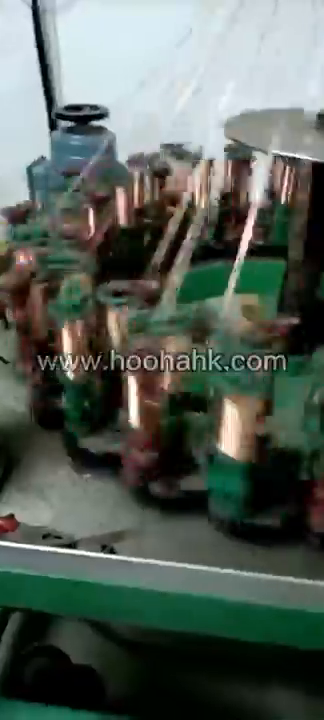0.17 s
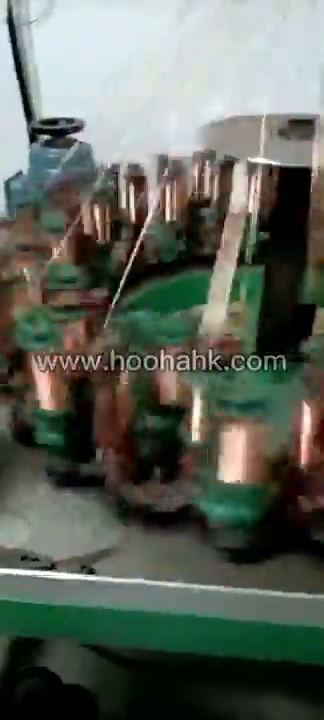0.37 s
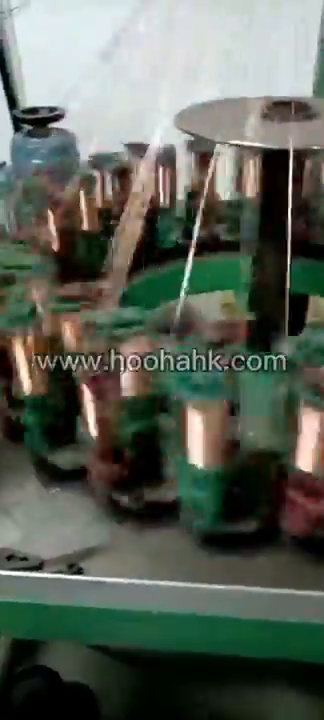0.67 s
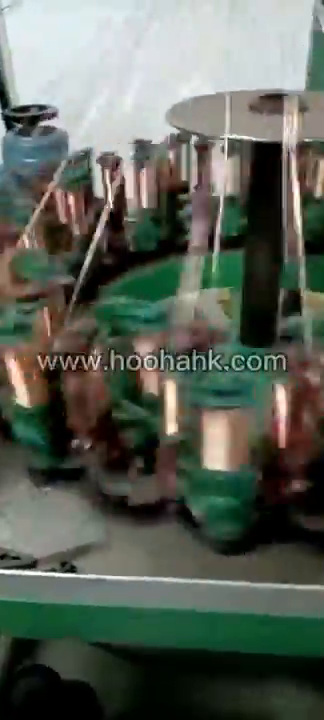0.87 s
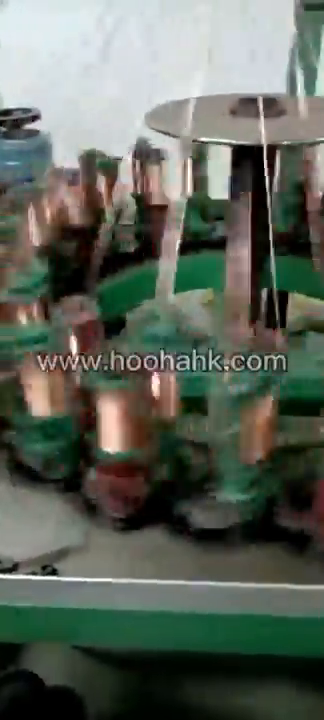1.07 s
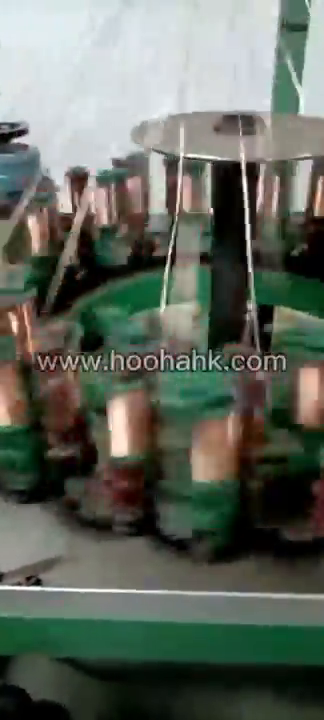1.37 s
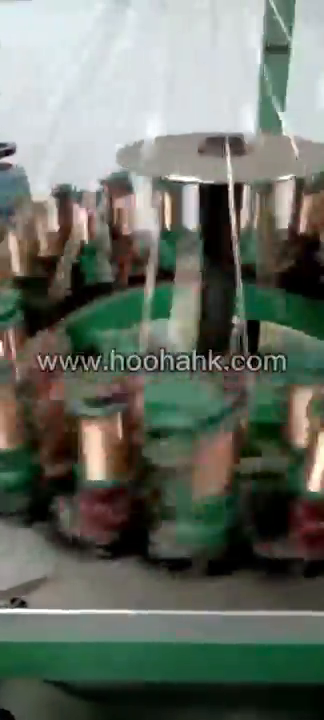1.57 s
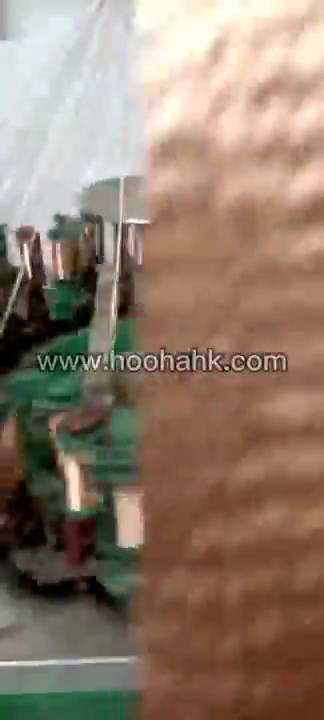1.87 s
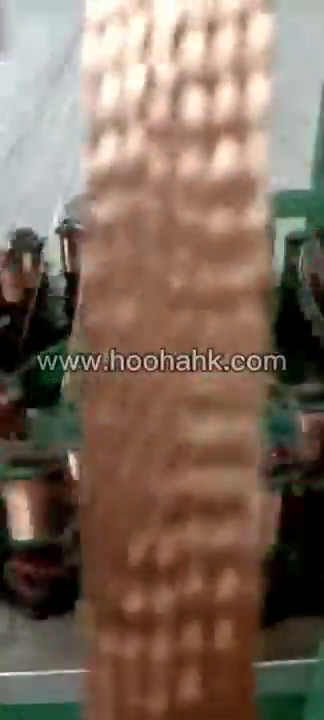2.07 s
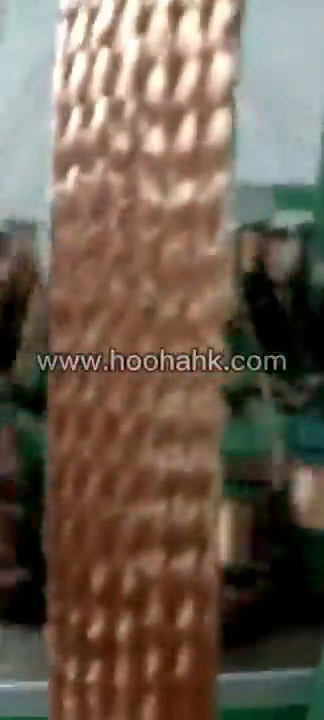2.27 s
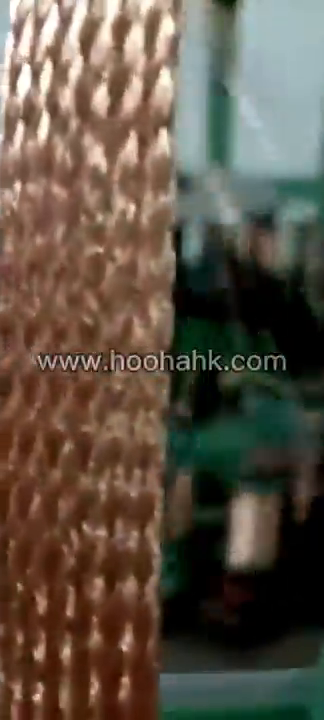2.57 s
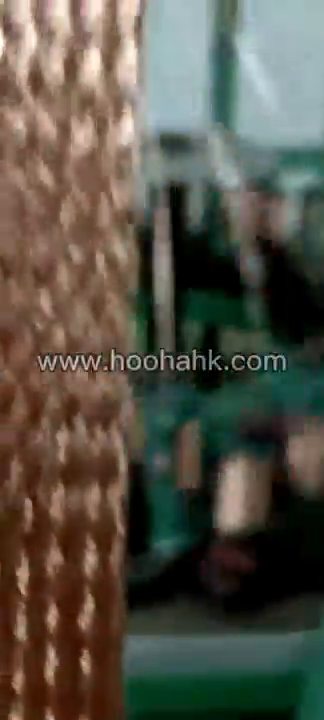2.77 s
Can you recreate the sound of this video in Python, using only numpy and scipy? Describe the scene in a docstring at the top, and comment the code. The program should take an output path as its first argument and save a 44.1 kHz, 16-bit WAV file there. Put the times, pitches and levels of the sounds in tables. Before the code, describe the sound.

Loud metallic clatter of a running wire braider, with clacking bobbin carriers and faint squeaking.

```python
"""A loud steel clatter cuts in abruptly and eases after a second: a wire braider, close by in a factory hall.
Horn gears hand bobbin carriers along their track; the frame thumps and rumbles under a thin gear whine,
a singing rod and the whistle of the motor drive. Loose carriers rattle, the frame knocks, steel clinks.
A dry bearing squeaks about once a turn, and carriers clack into the slots of the next gear."""
import sys
import numpy as np
from scipy import signal
from scipy.fft import rfft, irfft
from scipy.io import wavfile
from scipy.ndimage import uniform_filter1d

SR = 44100
rng = np.random.default_rng(int(sys.argv[2]) if len(sys.argv) > 2 else 0)


def waveform_to_disk(signal):
    """Save audio, clipped to [-1, 1], as 16-bit WAV at the path in sys.argv[1]."""
    frames = np.transpose(np.atleast_2d(signal))
    scaled = np.clip(frames, -1, 1) * 32767
    samples = np.round(scaled).astype(np.int16)
    wavfile.write(sys.argv[1], SR, samples)


N = 128772
T = np.arange(N) / SR

START_S, LOWPASS_HZ, HALL_T60_S = .105, 11500, 0.64
TURN_S, HANDOVERS_PER_TURN, TEETH_PER_TURN = .515, 4, 28  # horn gear
HANDOVER_AT_S, HANDOVER_SWING_DB, TOOTH_SWING_DB = .53, 0.94, -0.5
BLOWS_PER_S, PART_NOISE_T60_S, PART_TONE_T60_S, PART_SCATTER = 1500, 0.028, 0.062, .06
GEAR_HZ, GEAR_STEADY = 539.4, 0.57
ROD_HZ, ROD_WAVER_HZ = 1367, 4.12
DRIVE_HZ, DRIVE_STEP_HZ = 8940, 49.7
RATTLE_BLOWS_PER_S, RATTLE_DECAY_S, RATTLE_PEAK_DB, RATTLE_WIDTH_OCT = 460, 0.0087, 5, 0.34
KNOCK_RISE_S, KNOCK_T60_S = 0.0068, .16
CLINK_RISE_S, CLINK_T60_S = 0.00076, 0.019
SQUEAK_SAG, SQUEAK_FALL, SQUEAK_TAIL_FALL, SQUEAK_JITTER = 0.0175, 0.0121, .07, .012  # shares of pitch
SQUEAK_ROUGH_DB, SQUEAK_TAIL_DB, SQUEAK_TAIL_S = 4, -10, 0.079
CLACK_RISE_S, CLACK_T60_S = 0.00098, 0.038

# Machine loudness: time_s, clatter_db, thumps_db
MACHINE_LEVEL = [(.11, -26.5, -37), (.3, -24, -36), (.55, -24, -33), (.8, -23, -39.5), (.94, -24.5, -37),
                 (1.01, -30.5, -42), (1.1, -30.5, -37), (1.42, -29.5, -38.5), (1.5, -32, -35.5),
                 (1.6, -30, -40.5), (1.8, -30.5, -39.5), (2.0, -31.5, -37.5), (2.15, -29.5, -37),
                 (2.3, -30.5, -39.5), (2.6, -30, -37), (2.92, -32.5, -41)]
# Struck steel parts: pitch_hz
PART_HZ = [1597, 1720, 2386, 2510, 2620, 2926, 3085, 3500, 3830, 4506, 5790, 7040]
# Clatter spectrum: freq_hz, gain_db
STEEL_SPECTRUM = [(120, -9), (290, -1), (430, -1), (485, -5.5), (590, -0.5), (690, 2), (800, 3), (860, -3),
                  (940, -4), (1080, 0.5), (1220, -3), (1500, -1), (1680, 0.7), (2050, -0.5), (2500, -0.5),
                  (3200, -2), (4200, -3.5), (4600, -3), (5400, -5.5), (6000, -4.5), (7200, -7.5),
                  (8500, -8), (8900, -9.5), (9900, -9.5), (10700, -15.5), (11500, -36)]
# Frame thump spectrum: freq_hz, gain_db
FRAME_SPECTRUM = [(50, -25), (95, -7), (122, 2.5), (145, -0.5), (185, 2), (230, -1.5), (300, -13.5),
                  (700, -31.5)]
# Drive rumble spectrum: freq_hz, gain_db
RUMBLE_SPECTRUM = [(15, -8), (29, -1), (42, 0.5), (58, -3), (80, -4), (130, -10), (400, -43)]
# Gear tone loudness: time_s, level_db
GEAR_LEVEL = [(.3, -42), (1.2, -49.5), (2.9, -47)]
# Steel kept ringing: pitch_hz, width_hz, level_re_clatter_db
STEEL_MODES = [(450, 12, -34), (570, 11, -31.5), (800, 31, -23), (826, 20, -26), (4330, 26, -33),
               (6800, 35, -37)]
# Singing rod loudness: time_s, level_db
ROD_LEVEL = [(.1, -64), (.55, -39.5), (.7, -41), (.92, -37), (1.1, -46.5), (1.4, -49), (2.9, -57)]
# Drive whistle loudness: time_s, level_db
DRIVE_LEVEL = [(.1, -42), (1.4, -48.5), (1.7, -46), (2.9, -70)]
# Carrier rattles: start_s, length_s, level_db, centre_hz
RATTLES = [(0.12, 0.025, -25.5, 4470), (0.374, 0.064, -27.5, 3200), (0.522, 0.039, -23, 2700),
           (0.654, 0.061, -27, 2610), (1.003, 0.053, -27, 4860), (1.151, 0.028, -29.5, 2360),
           (1.175, 0.029, -27, 2700), (1.307, 0.02, -38, 3100), (1.388, .055, -32, 4200),
           (1.546, 0.031, -30.5, 3500), (1.649, 0.031, -30, 3900), (2.667, 0.036, -27.5, 4300),
           (2.804, 0.049, -31, 3300)]
# Frame knocks: start_s, level_db, pitch_hz
KNOCKS = [(.19, -30.5, 183), (.19, -31, 764), (.316, -31, 178), (.32, -29.5, 775), (.43, -30, 795),
          (.511, -30, 175), (0.589, -28, 190), (0.671, -30.5, 86), (.791, -30.5, 196), (.8, -35, 770),
          (.828, -27.5, 830), (.92, -30, 750), (.96, -32, 796), (1.075, -39, 784), (1.241, -31, 169),
          (1.348, -28.5, 805), (1.764, -29.5, 116), (1.905, -33.5, 796), (2.039, -33, 134),
          (2.36, -32, 885)]
# Steel clinks: start_s, level_db, pitch_hz
CLINKS = [(.363, -29, 6500), (.928, -19.5, 5140), (1.0105, -16.5, 6800), (1.18, -24, 5960),
          (1.3569, -14, 6580), (1.402, -17.5, 6500), (1.549, -17, 6670), (1.774, -19, 6200),
          (2.8016, -19, 7000)]
# Clink tick spectrum: freq_hz, gain_db
TICK_SPECTRUM = [(800, -14), (2800, -20), (4500, -3), (5500, 10), (6700, 14), (7600, -2), (10000, 5.5),
                 (11500, -12)]
# Bearing squeaks: centre_s, length_s, pitch_hz, level_db
SQUEAKS = [(0.527, 0.075, 6780, -33.5), (0.584, .062, 7720, -28), (1.102, 0.071, 7770, -33),
           (1.625, .068, 7720, -38.5), (2.117, .071, 7770, -39.5), (2.544, 0.038, 7150, -37),
           (2.585, 0.037, 6600, -30.5), (2.643, 0.047, 7760, -34.5), (2.7, 0.052, 7200, -40)]
# Carriers changing gears: start_s, level_db, pitch_hz
CLACKS = [(1.181, -23.5, 2750), (1.3105, -20, 2930), (1.423, -29, 5500), (1.567, -25, 2770),
          (1.66, -32, 3200), (1.677, -21.5, 3850), (1.925, -27, 3400), (1.949, -29, 3750),
          (2.037, -25, 3320), (2.052, -28, 3280), (2.081, -26.5, 3020), (2.166, -25, 2650),
          (2.187, -24, 4800), (2.2045, -25.5, 4500), (2.24, -37, 2980), (2.3003, -30, 3900),
          (2.421, -25, 4500), (2.461, -33, 3000), (2.567, -26, 3350), (2.678, -24, 2600)]
# Track crack spectrum: freq_hz, gain_db
CRACK_SPECTRUM = [(700, -16), (2500, 0.5), (4500, -0.5), (7000, -2), (11000, -11)]


def amp(db):
    """Decibels to gain."""
    return 10 ** (np.asarray(db) / 20)


def unit(x):
    """Scales to rms 1."""
    return x / np.sqrt(np.mean(x ** 2) + 1e-20)


def add(mix, start_s, sound):
    """Mixes a sound in at start_s."""
    part = mix[max(round(start_s * SR), 0):][:len(sound)]
    part += sound[:len(part)]


def level(table, column=1):
    """Gain over time from a dB column."""
    rows = np.array(table)
    return amp(np.interp(T, rows[:, 0], rows[:, column]))


def colour(x, spectrum):
    """Filters by (freq_hz, gain_db) points."""
    hz, db = np.transpose(spectrum)
    f = np.fft.rfftfreq(len(x), 1 / SR)
    return irfft(rfft(x) * amp(np.interp(np.log(f + 1), np.log(hz + 1), db)), len(x))


def ring(size, hz, width_hz):
    """Noise-driven resonance, rms 1."""
    f = np.fft.rfftfreq(size, 1 / SR)
    return unit(irfft(rfft(rng.standard_normal(size)) / (1 + (2 * (f - hz) / width_hz) ** 2), size))


def waver(samples):
    """Smoothed random wobble, rms 1."""
    return unit(uniform_filter1d(rng.standard_normal(N), size=samples))


def blows(per_s, spread_db):
    """Random impacts, a few harder than the rest."""
    strength = amp(spread_db * np.minimum(rng.exponential(1, N), 4))
    return strength * rng.choice([-1, 1], N) * (rng.random(N) < per_s / SR)


def hall(x, wet):
    """Adds the hall's diffuse echo."""
    t = T[:SR // 2]
    tail = rng.standard_normal(len(t)) * amp(-60 * t / HALL_T60_S) * np.minimum(t / 0.0021, 1)
    return x + wet * signal.fftconvolve(x, tail / np.linalg.norm(tail))[:N]


def carrier_clatter():
    """Blows on short-ringing steel parts, surging with each handover and drive tooth."""
    angle = 2 * np.pi * (T - HANDOVER_AT_S) / TURN_S
    handover_db = HANDOVER_SWING_DB * np.cos(HANDOVERS_PER_TURN * angle)
    force = amp(handover_db + TOOTH_SWING_DB * np.cos(TEETH_PER_TURN * angle))
    t, clatter = T[:2048], np.zeros(N)
    # pitch varies with where a part is struck
    pitches_hz = np.outer(PART_HZ, 1 + PART_SCATTER * np.linspace(-1, 1, 5)).ravel()
    for hz in pitches_hz:
        tone = 0.2 * np.sin(2 * np.pi * hz * t) * amp(-60 * t / PART_TONE_T60_S)
        part = unit(rng.standard_normal(len(t)) * amp(-60 * t / PART_NOISE_T60_S) + tone)
        hits = force * blows(BLOWS_PER_S / len(pitches_hz), spread_db=1.5)
        clatter += signal.oaconvolve(hits, part)[:N]
    return level(MACHINE_LEVEL) * unit(colour(hall(clatter, wet=0.43), STEEL_SPECTRUM))


def frame_rumble():
    """Heavy carriers thump the frame over the drive's steady rumble."""
    thumps = unit(colour(blows(per_s=900, spread_db=1), FRAME_SPECTRUM))
    rumble = unit(colour(rng.standard_normal(N), RUMBLE_SPECTRUM))
    return level(MACHINE_LEVEL, column=2) * thumps + amp(-40.5) * rumble


def gear_whine():
    """Wavering gear tone: a sine plus narrow noise."""
    tone = np.sqrt(2) * np.sin(2 * np.pi * GEAR_HZ * T)
    noise = ring(N, GEAR_HZ, width_hz=14)
    return level(GEAR_LEVEL) * unit(GEAR_STEADY * tone + (1 - GEAR_STEADY) * noise)


def steel_ring():
    """Steel resonances that follow the clatter's level."""
    return level(MACHINE_LEVEL) * sum(amp(db) * ring(N, hz, width_hz) for hz, width_hz, db in STEEL_MODES)


def rod_sing():
    """A steel rod's thin tone swells and dies away."""
    pitch_hz = ROD_HZ + ROD_WAVER_HZ * waver(samples=2000)
    return level(ROD_LEVEL) * unit(np.sin(2 * np.pi * np.cumsum(pitch_hz) / SR))


def drive_whistle():
    """The motor drive whistles in a cluster of close tones."""
    tones = sum(ring(N, DRIVE_HZ + k * DRIVE_STEP_HZ, width_hz=20) for k in (-1, 0, 1, 3))
    return level(DRIVE_LEVEL) * unit(tones)


def carrier_rattle(length_s, db, hz):
    """A loose carrier chatters on the track in a run of small blows."""
    t = T[:8192]
    f = np.fft.rfftfreq(len(t), 1 / SR) + 1
    body = amp(RATTLE_PEAK_DB * np.exp(-(np.log2(f / hz) / RATTLE_WIDTH_OCT) ** 2)) * f / (f + 2200)
    hits = rng.random(len(t)) < RATTLE_BLOWS_PER_S / SR
    energy = signal.lfilter([1], [1, -np.exp(-1 / (RATTLE_DECAY_S * SR))], hits)
    chatter = colour(np.sqrt(energy) * rng.standard_normal(len(t)), STEEL_SPECTRUM)
    swell = np.sin(np.pi * np.minimum(t / length_s, 1) ** 0.62)  # rises faster than it fades
    return amp(db) * swell * unit(irfft(rfft(chatter) * body))


def frame_knock(db, hz):
    """A heavier blow booms in the frame."""
    t = T[:8192]
    envelope = np.minimum(t / KNOCK_RISE_S, 1) * amp(db - 60 * t / KNOCK_T60_S)
    return envelope * ring(len(t), hz, width_hz=0.22 * hz)


def steel_clink(db, hz):
    """Steel on steel: a broad tick with a bright, damped ring."""
    t = T[:4096]
    tick = unit(colour(rng.standard_normal(len(t)), TICK_SPECTRUM))
    envelope = np.minimum(t / CLINK_RISE_S, 1) * amp(db - 60 * t / CLINK_T60_S)
    return envelope * unit(ring(len(t), hz, width_hz=1000) + 1.3 * tick)


def bearing_squeak(length_s, hz, db):
    """A dry bearing rasps through a shallow pitch arch, then slips into a falling tail."""
    t = T[:int((length_s + SQUEAK_TAIL_S) * SR)]
    arch = np.minimum(2 * t / length_s - 1, 1)  # -1 to 1
    tail = np.clip((t - length_s) / SQUEAK_TAIL_S, 0, 1)
    glide = 1 - SQUEAK_SAG * arch ** 2 - SQUEAK_FALL * arch - SQUEAK_TAIL_FALL * tail
    pitch_hz = hz * (glide + SQUEAK_JITTER * waver(samples=40)[:len(t)])
    phase = 2 * np.pi * np.cumsum(pitch_hz) / SR
    tone = unit(amp(SQUEAK_ROUGH_DB * waver(samples=200)[:len(t)]) * np.sin(phase))
    rasp = unit(ring(len(t), 0, width_hz=420) * np.cos(phase))
    swell = np.cos(np.pi * arch / 2) + amp(SQUEAK_TAIL_DB) * np.maximum(arch, 0) * np.sqrt(1 - tail)
    return amp(db) * swell * unit(tone + 0.41 * rasp)


def carrier_clack(db, hz):
    """A carrier drops into the next gear's slot: a dry crack with a short ring."""
    t = T[:4096]
    crack = unit(colour(rng.standard_normal(len(t)), CRACK_SPECTRUM))
    envelope = np.minimum(t / CLACK_RISE_S, 1) * amp(db - 60 * t / CLACK_T60_S)
    return envelope * unit(ring(len(t), hz, width_hz=0.3 * hz) + 0.99 * crack)


def scene():
    """The machine in its hall, mono on two channels."""
    near, knocks, clinks, clacks = np.zeros((4, N))
    mono = carrier_clatter() + frame_rumble() + gear_whine() + steel_ring() + rod_sing() + drive_whistle()
    for start_s, *row in RATTLES:
        add(near, start_s, carrier_rattle(*row))
    for start_s, *row in KNOCKS:
        add(knocks, start_s, frame_knock(*row))
    for start_s, *row in CLINKS:
        add(clinks, start_s, steel_clink(*row))
    for centre_s, length_s, hz, db in SQUEAKS:
        add(near, centre_s - length_s / 2, bearing_squeak(length_s, hz, db))
    for start_s, *row in CLACKS:
        add(clacks, start_s, carrier_clack(*row))
    for layer, wet in (near, 0.37), (knocks, 0.4), (clinks, 0.75), (clacks, 0.27):
        mono += hall(layer, wet)
    return np.array([mono, mono])


def record(dry):
    """Abrupt cut-in, then low-pass."""
    gate = np.clip((T - START_S) / 0.0018, 0, 1)
    lowpass = signal.firwin(301, LOWPASS_HZ, window=("kaiser", 9), fs=SR)
    return signal.oaconvolve(dry * gate, lowpass[None], "same")


dry = scene()
out = record(dry)
waveform_to_disk(out)
```